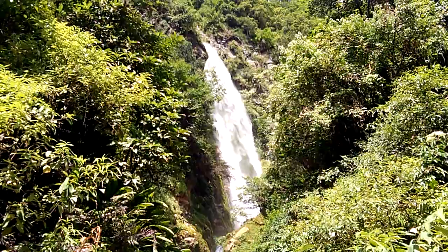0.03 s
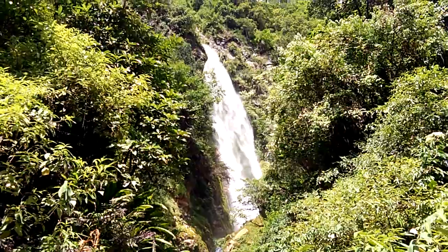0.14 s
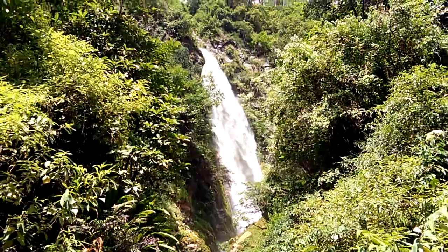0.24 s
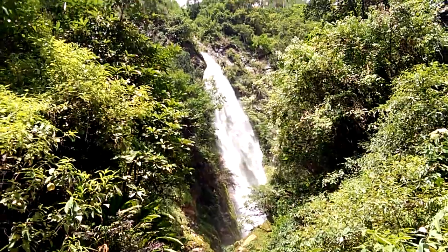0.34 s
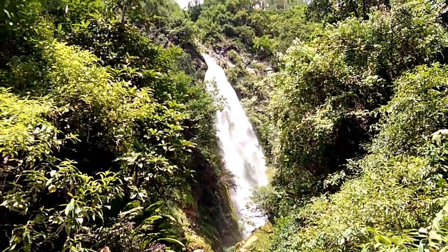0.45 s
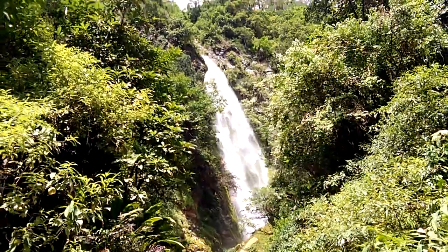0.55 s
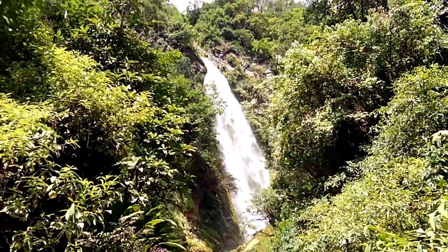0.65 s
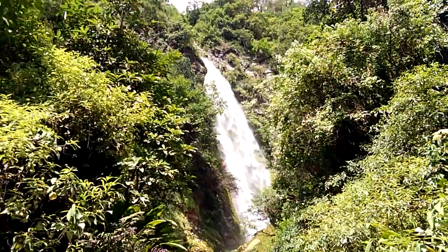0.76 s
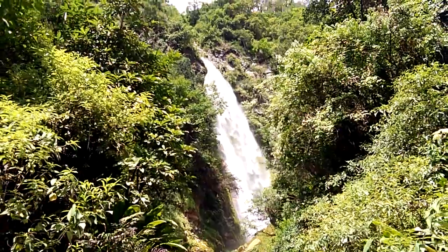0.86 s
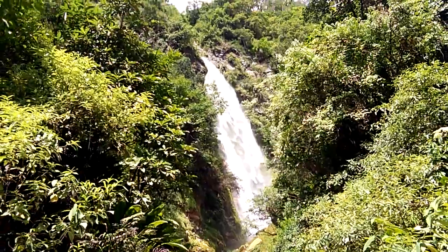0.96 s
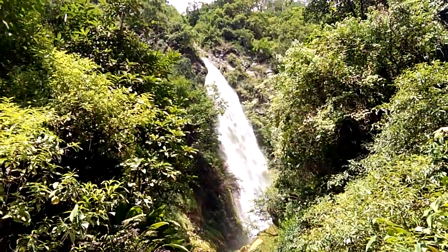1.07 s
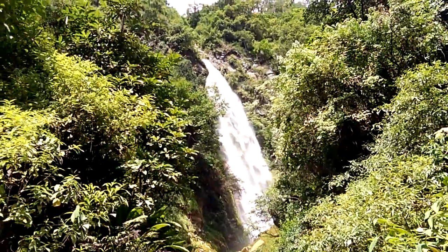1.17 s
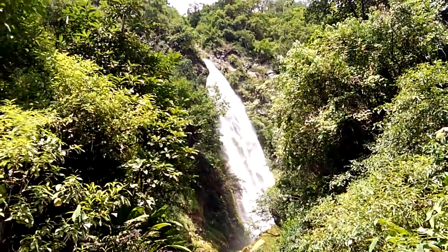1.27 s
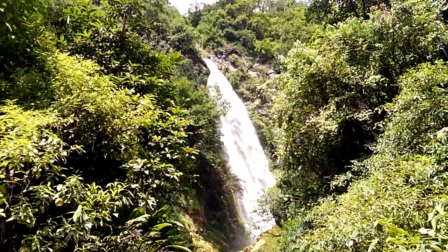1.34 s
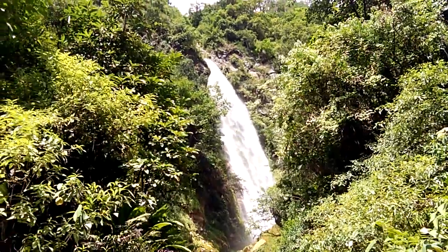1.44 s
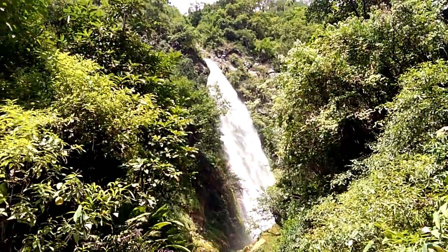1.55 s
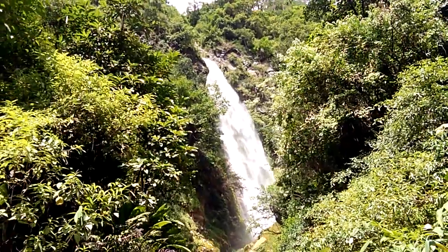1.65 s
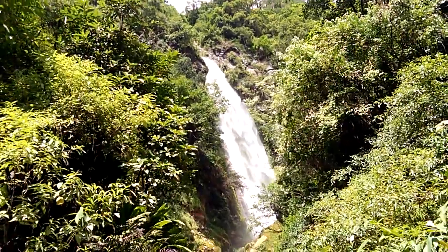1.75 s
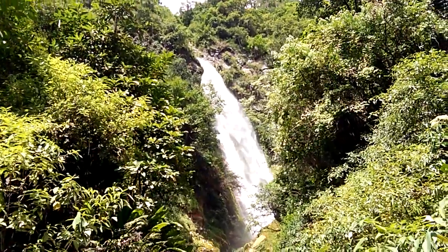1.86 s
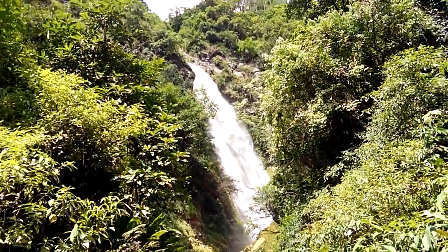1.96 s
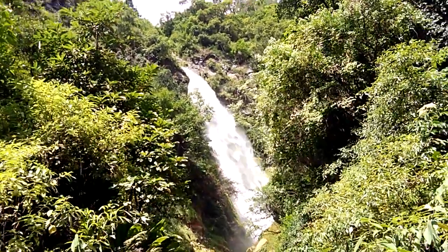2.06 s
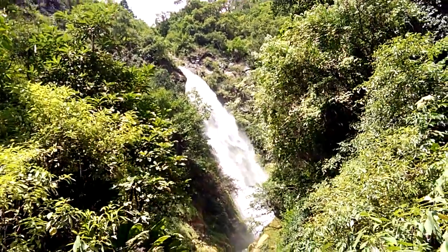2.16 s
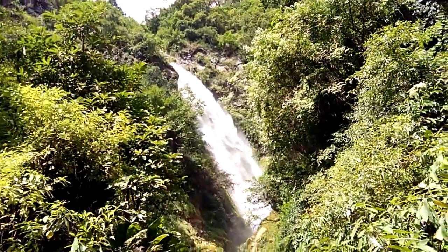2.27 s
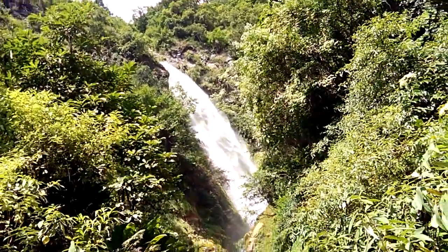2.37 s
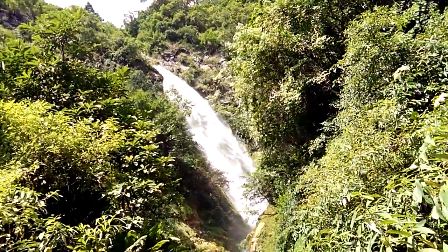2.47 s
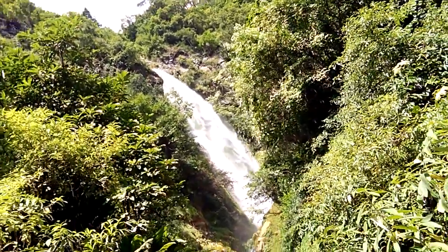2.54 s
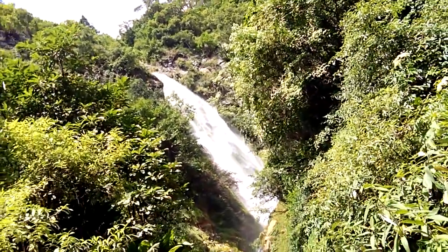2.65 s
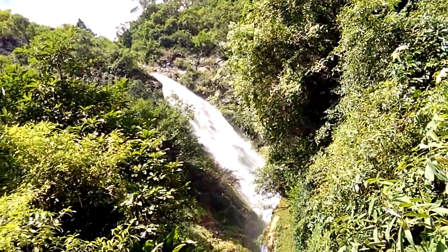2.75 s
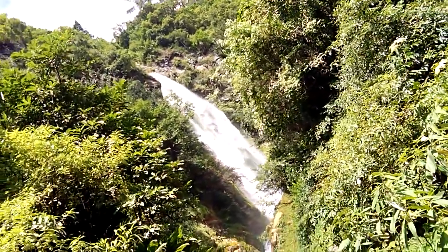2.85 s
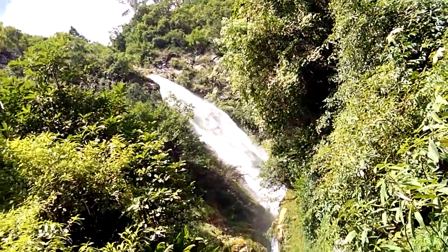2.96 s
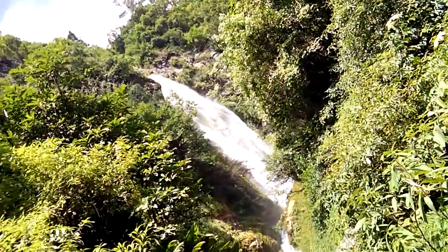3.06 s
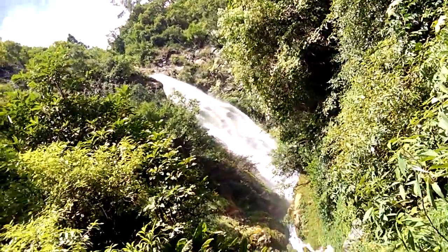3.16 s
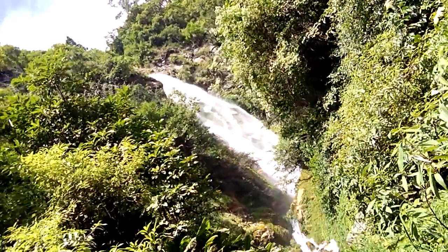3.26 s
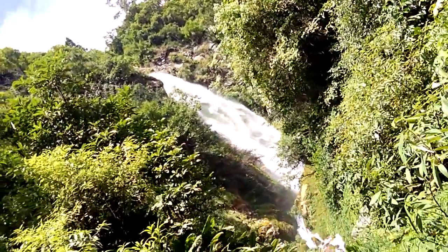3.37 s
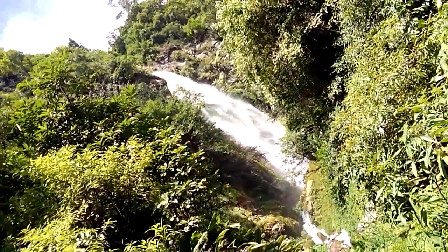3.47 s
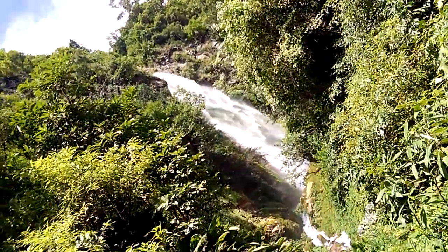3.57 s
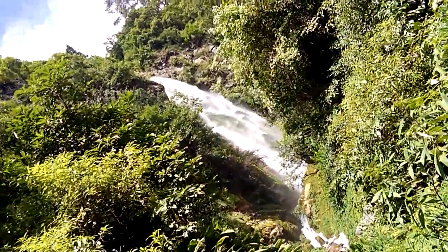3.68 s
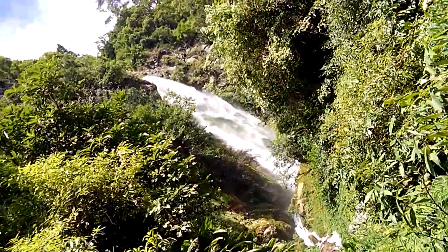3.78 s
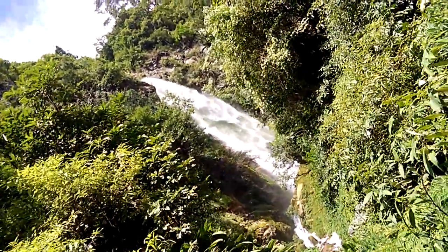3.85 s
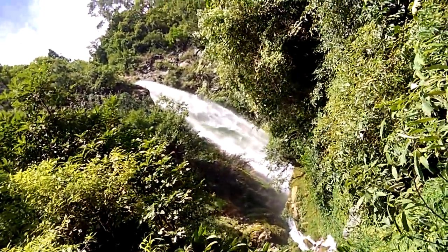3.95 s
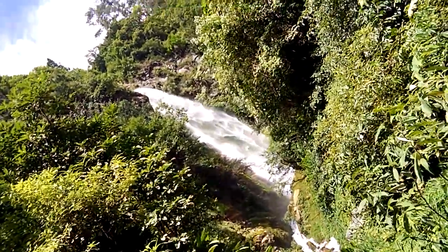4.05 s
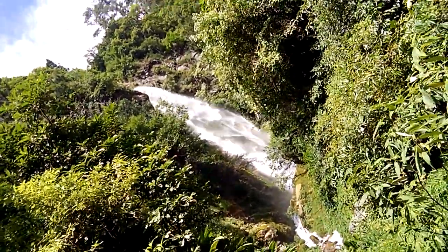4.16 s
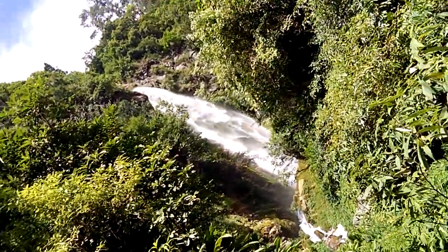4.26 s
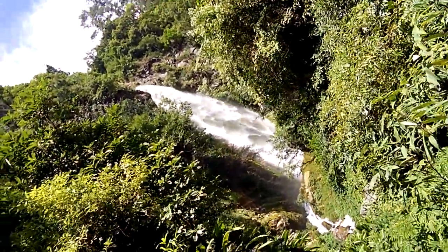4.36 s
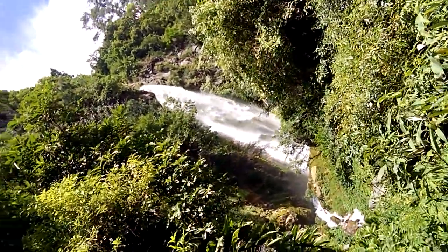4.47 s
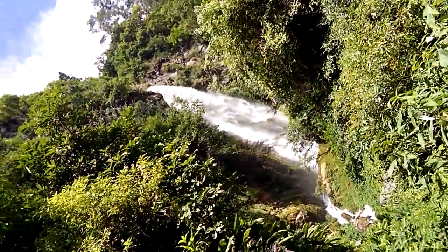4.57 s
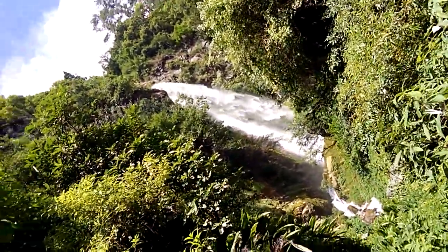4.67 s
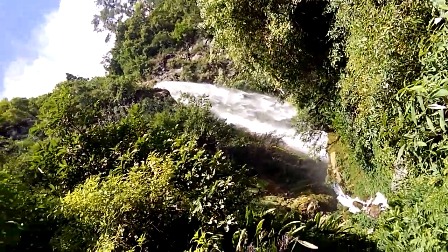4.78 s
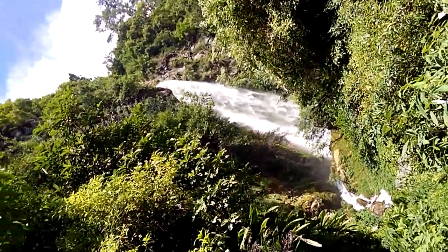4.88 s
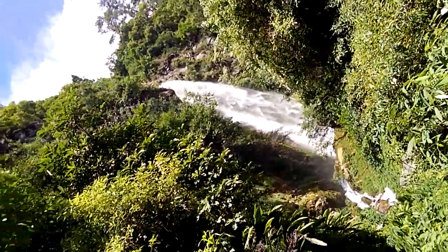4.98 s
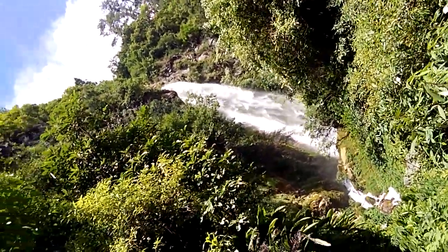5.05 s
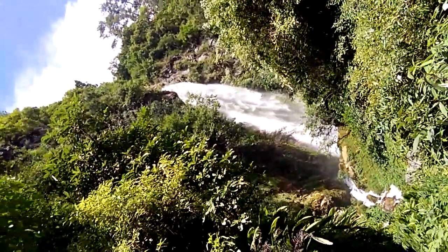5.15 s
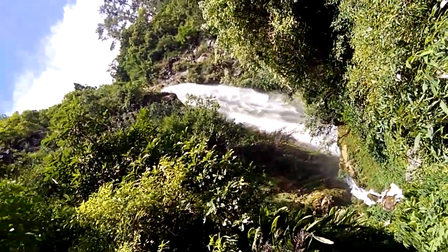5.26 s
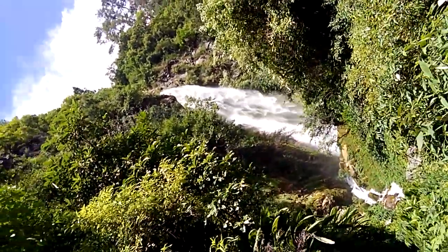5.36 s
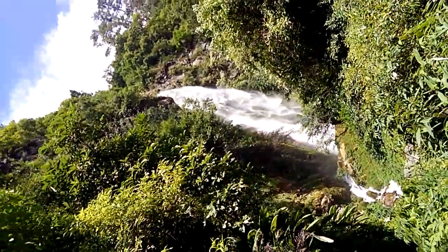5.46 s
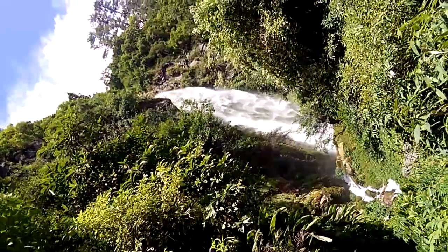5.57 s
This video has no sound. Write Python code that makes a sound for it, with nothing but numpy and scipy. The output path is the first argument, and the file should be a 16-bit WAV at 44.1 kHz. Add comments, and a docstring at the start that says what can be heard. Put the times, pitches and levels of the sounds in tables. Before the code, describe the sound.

After half a second of silence, a waterfall's steady roar cuts in abruptly, with faint regular chirps and low wind thumps near the end.

```python
"""A tall waterfall roars in a wooded gorge, cutting in after half a second of silence over a trace of light air.
A small animal, perhaps a frog, chirps faintly about three times a second: three noisy resonances under short swells.
The microphone swings towards the foaming stream: the rush comes forward and a notch slides up the treble.
In the last two seconds wind gusts rumble and thump on the microphone. The water is noise coloured by the fall
and the stream and churned in patches; the wind is low noise swelling in gusts, with single-eddy pulses."""
import sys
import numpy as np
from scipy import signal
from scipy.fft import rfft
from scipy.io import wavfile
from scipy.ndimage import uniform_filter1d

SR = 44100
rng = np.random.default_rng(int(sys.argv[2]) if len(sys.argv) > 2 else 0)


def to_wav(sig):
    """Store sig (one row per channel, or 1-D mono) as 16-bit WAV at the path in sys.argv[1].

    Samples outside -1..1 are clipped; the rate is SR.
    """
    pcm = np.clip(np.atleast_2d(sig), -1, 1) * 32767
    pcm = np.round(pcm).astype(np.int16)
    wavfile.write(sys.argv[1], SR, pcm.T)  # frames by channels


N = 247842
TIME = np.arange(N) / SR  # s


def gain_of(db):
    """Decibels to an amplitude factor."""
    return 10 ** (np.asarray(db) / 20)


def evened(x):
    """Scales to rms 1."""
    return x / np.sqrt(np.mean(x ** 2) + 1e-20)


def bell(x, spread):
    """A smooth hump of height 1 around zero."""
    return np.exp(-.5 * (x / spread) ** 2)


def band(hz, centre_hz, octaves):
    """A bell of height 1 over log frequency."""
    return bell(np.log2((hz + 1) / centre_hz), octaves)


def read_spectrum(points, hz):
    """A spectrum joined by straight lines over log frequency."""
    f, level_db = np.transpose(points)
    return np.interp(np.log(hz + 1), np.log(f + 1), level_db)


def at_level(points, hz, level_db):
    """Magnitudes that bring white noise of rms 1 to this spectrum and level."""
    shape = gain_of(read_spectrum(points, hz))
    return gain_of(level_db) * evened(shape)


def follow(rows, t):
    """Every column of a curve at the times t."""
    s, *columns = np.transpose(rows)
    return [np.interp(t, s, c) for c in columns]


def noise(shape):
    """Noise of rms 1 with the magnitude shape(Hz)."""
    spectrum = rfft(rng.standard_normal(N))
    hz = np.fft.rfftfreq(N, 1 / SR)
    return evened(np.fft.irfft(spectrum * shape(hz), N))


def lumps(field, size):
    """Smooths a random frames x bins field into lumps of the given size, at rms 1."""
    for axis, length in enumerate(size):
        # two passes round off the lumps
        field = uniform_filter1d(field, length, axis)
        field = uniform_filter1d(field, length, axis)
    return evened(field)


# sound bending round the housing cancels one band, which climbs with the turn and is deepest facing the stream
NOTCH_HZ, NOTCH_OCTAVES_PER_TURN, NOTCH_DB, NOTCH_TURN_SPREAD = 12000, .9, 5.8, .24
# halfway through the swing a lower band stands out
LIFT_HZ, LIFT_DB, LIFT_TURN, LIFT_TURN_SPREAD = 6700, 3, 0.5, 0.3


def housing(hz, turn, notch_octaves=0.15, lift_octaves=0.15):
    """Colour in dB that the microphone's housing gives the water at this turn."""
    notch_hz = NOTCH_HZ * 2 ** (NOTCH_OCTAVES_PER_TURN * (turn - 1))
    notch_depth_db = NOTCH_DB * bell(turn - 1, NOTCH_TURN_SPREAD)
    lift_height_db = LIFT_DB * bell(turn - LIFT_TURN, LIFT_TURN_SPREAD)
    notch_db = notch_depth_db * band(hz, notch_hz, notch_octaves)
    lift_db = lift_height_db * band(hz, LIFT_HZ, lift_octaves)
    return lift_db - notch_db


# colour of the water facing the fall [f/Hz, relative level/dB per Hz]
FALL_SPECTRUM = [(20, -3.5), (160, -0.5), (550, 0.5), (900, -0.5), (1250, -4.0), (1750, -3.5), (2400, -8.5),
                 (3100, -10.5), (3900, -15.0), (4900, -15.5), (7500, -29), (9800, -32), (11500, -29.5),
                 (15300, -37.5)]
# colour of the water facing the stream at its foot [f/Hz, relative level/dB per Hz]
STREAM_SPECTRUM = [(20, -5.5), (200, -1.5), (750, 0), (1300, -3.5), (2000, -.5), (3000, -7.5),
                   (4100, -15.5), (4800, -15.5), (5600, -20.5), (6600, -22.5), (8000, -30), (11000, -33),
                   (15300, -36.5)]
FALL_DB, STREAM_DB = -31, -30  # rms level of each view, before the swing's own level
# the microphone holds on the fall, swings round quickly, then creeps a little further
# [t/s, turn (0 fall, 1 stream), water level/dB, treble tilt/dB per octave above 5 kHz]
MIC_SWING = [(.6, 0.058, .5, -.8), (2.4, -0.03, 0, -0.2), (3.45, 0.0031, -.5, 1.3), (4.18, 0.87, 0, 1.2),
             (4.85, 1.08, 0.5, .9), (5.62, 1.2, .2, 1.1)]


def water(patchy_db=0.6, surge_db=0.03, splash_db=0.37):
    """Countless impacts and bubbles merge into a roar; clumps of falling water lift patches of it for a moment."""
    hz, t, z = signal.stft(rng.standard_normal(N), SR, nperseg=1024, noverlap=768)
    frames, t = z.T, t[:, None]
    turn, level_db, tilt_db = follow(MIC_SWING, t)
    fall = at_level(FALL_SPECTRUM, hz, FALL_DB)
    stream = at_level(STREAM_SPECTRUM, hz, STREAM_DB)
    colour = fall ** (1 - turn) * stream ** turn
    # treble is the most directional part
    octaves_above = np.log2(np.maximum(hz / 5000, 1))
    aim_db = tilt_db * octaves_above + housing(hz, turn)
    # clumps colour narrow bands, splashes flick wide ones, and the whole flow surges slowly
    churn_db = patchy_db * lumps(rng.standard_normal(frames.shape), size=(10, 9))
    churn_db += splash_db * lumps(rng.standard_normal(frames.shape), size=(3, 70))
    churn_db += surge_db * lumps(rng.standard_normal(t.shape), size=(24, 1))
    frames = frames * colour * gain_of(level_db + aim_db + churn_db)
    return signal.istft(frames.T, SR, nperseg=1024, noverlap=768)[1][:N]


# colour of turbulence at the microphone [f/Hz, relative level/dB per Hz]
WIND_SPECTRUM = [(10, -31.5), (25, 1), (45, -2.5), (70, -7.5), (110, -13), (180, -19), (400, -36),
                 (1000, -80)]
# gusts at the microphone [t/s at the height, length/s (twice the bell's spread), level/dB]
WIND_GUSTS = [(3.676, .2, -39), (4.12, 0.093, -34.5), (4.412, .2, -36), (4.76, 0.13, -35.5),
              (5.157, 0.23, -30.5), (5.44, .14, -32.5), (5.547, .1, -29)]
# single eddies that hit the microphone [t/s, peak level/dB, strongest f/Hz]
EDDY_THUMPS = [(4.387, -26, 62.4), (4.416, -25, 70.4), (4.746, -31, 62), (4.777, -36, 42)]
BREEZE_DB = -55  # light air beneath the gusts


def wind():
    """Turbulence presses on the microphone in gusts that swell and die, with a few single eddies as dull thumps."""
    power = gain_of(BREEZE_DB) ** 2
    for s, length, db in WIND_GUSTS:
        power = power + (gain_of(db) * bell(TIME - s, length / 2)) ** 2
    out = np.sqrt(power) * noise(lambda hz: gain_of(read_spectrum(WIND_SPECTRUM, hz)))
    for s, peak_db, hz in EDDY_THUMPS:
        # a passing eddy sucks, then pushes
        u = 2 * np.pi * hz * (TIME - s)
        out += gain_of(peak_db) * u * np.exp((1 - u ** 2) / 2)
    return out


# resonances of the animal's voice [f/Hz, width/Hz at half magnitude, level/dB, gain/dB per full turn to the stream]
VOICE_RESONANCES = [(2680, 180, -10, 10), (3140, 190, -2, 5), (3900, 200, -6.5, 0.5)]
# a steady pace, a little uneven in strength (level before the resonances' own levels)
FIRST_CHIRP_S, CHIRP_EVERY_S, CHIRP_DB, CHIRP_UNEVEN_DB = .762, .3432, -43.5, 1


def chirps(rise_s=.022, fade_s=0.024):
    """Short rasping calls: noise through three resonances, swelling and fading softly at an even pace."""
    turn = follow(MIC_SWING, TIME)[0]
    rasp = np.zeros(N)
    for centre, width, db, turned_db in VOICE_RESONANCES:
        resonance = noise(lambda hz: 1 / (1 + (2 * (hz - centre) / width) ** 2))
        rasp += gain_of(db + turn * turned_db) * resonance
    calls = np.zeros(N)
    for s in np.arange(FIRST_CHIRP_S, N / SR, CHIRP_EVERY_S):
        call_db = CHIRP_DB + CHIRP_UNEVEN_DB * rng.standard_normal()
        spread_s = np.where(TIME < s, rise_s, fade_s)
        calls += gain_of(call_db) * bell(TIME - s, spread_s)
    return rasp * calls


def scene():
    """Water, wind and the chirping animal at one microphone."""
    return (water() + wind() + chirps())[None]


START_S, EDGE_HZ = .583, 15450  # the cut-in, and the top of the band


def record(dry):
    """The sound cuts in over 2 ms; then a steep low-pass limits the band."""
    live = np.clip((TIME - START_S) / .002, 0, 1)
    low_pass = signal.firwin(1023, EDGE_HZ, window=("kaiser", 9), fs=SR)
    return signal.oaconvolve(dry * live, low_pass[None], "same")


dry = scene()
out = record(dry)
to_wav(out)
```